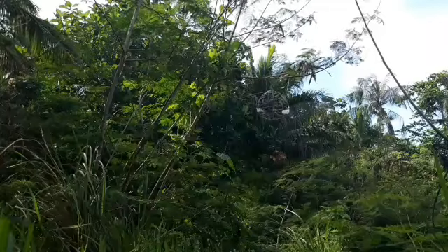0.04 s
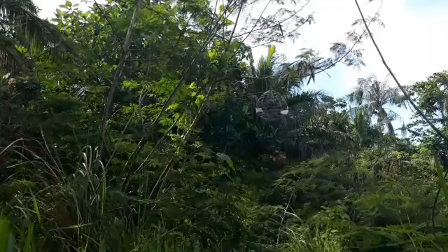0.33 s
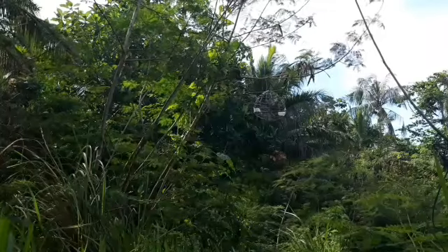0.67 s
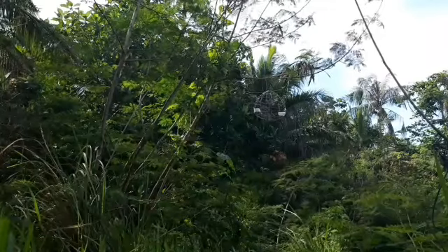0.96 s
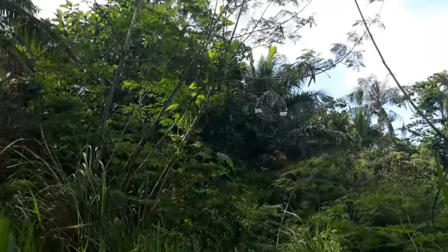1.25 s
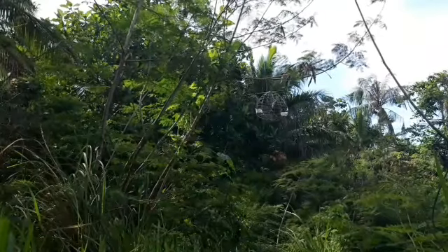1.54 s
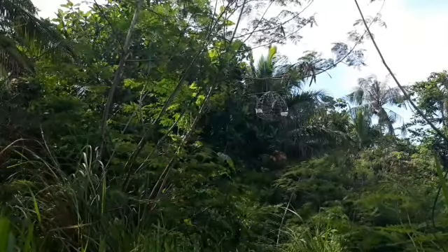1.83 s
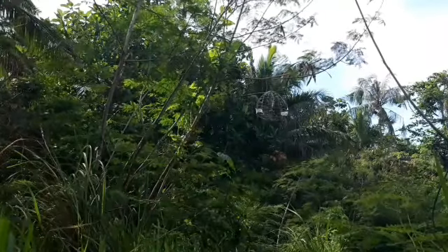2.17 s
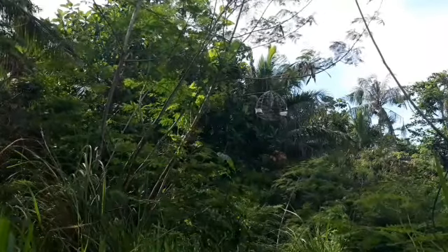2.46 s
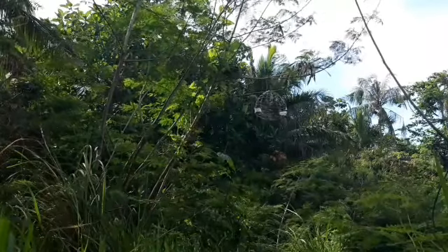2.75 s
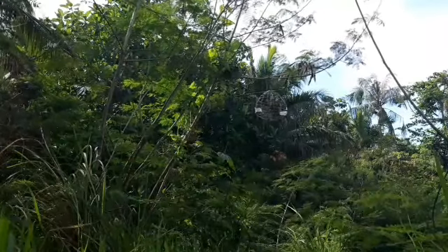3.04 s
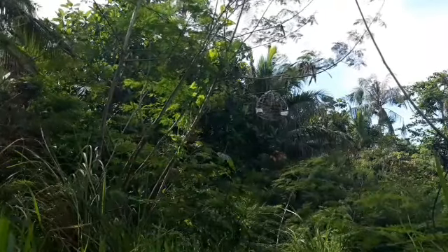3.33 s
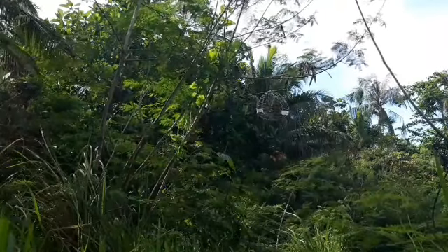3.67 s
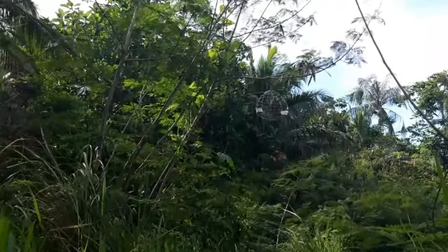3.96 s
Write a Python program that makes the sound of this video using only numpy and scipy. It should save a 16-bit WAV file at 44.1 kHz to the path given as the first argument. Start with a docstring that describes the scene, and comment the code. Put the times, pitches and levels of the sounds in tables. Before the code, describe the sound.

A dove coos throughout the four seconds in dense bush, its short notes leaping upward at first, then quickening into softer, even hoots from about 2 seconds. High cricket chirps pulse nearby and katydids buzz and rasp, with a brief insect trill from 1 to 1.5 seconds. Far birds faintly squawk, hoot and whistle. A faint distant engine swells around 3 seconds under softly rushing air.

```python
"""Dense tropical bush, one microphone among the leaves. A dove gives a run of upward-leaping coos
that quicken and flatten into even hoots. Around it katydids buzz and rasp with tooth strikes of their
wings, and crickets chirp and trill in wing strokes. Farther off, birds whistle, hoot and squawk, and a
distant engine swells under the soft rush of open air. The foliage scatters the birds and crickets."""
import sys
import numpy as np
from scipy import signal
from scipy.fft import rfft, irfft
from scipy.io import wavfile

SR = 44100
rng = np.random.default_rng(int(sys.argv[2]) if len(sys.argv) > 2 else 0)


def dump_mix(stems):
    """Bounce the given channels to the path in sys.argv[1] as a 16-bit WAV at rate SR."""
    frames = np.atleast_2d(stems).T  # one column per channel
    limited = np.clip(frames, -1, 1)  # hard clip at full scale
    pcm = np.round(limited * 32767).astype(np.int16)
    wavfile.write(sys.argv[1], SR, pcm)


N = 176400
T = np.arange(N) / SR


def dove():
    """Each coo swells on its low pitch, leaps up, holds loud and sags; the nearest trees echo it."""
    # Each row: start in seconds, length in seconds, moment of the leap as a share of it, level in dB.
    coos = [(0.126,0.11,0.42,-35),(0.308,0.083,0.44,-36),(.503,.094,0.47,-35),(0.66,0.066,0.5,-35.5),(0.812,.088,0.57,-35),(0.951,0.064,0.62,-35),
            (1.1,0.075,0.59,-35),(1.215,0.059,0.71,-35),(1.346,0.08,0.69,-36.5),(1.467,0.055,0.65,-36),(1.592,0.066,0.73,-35.5),(1.695,0.05,0.7,-35.5),
            (1.807,0.066,0.72,-36.5),(1.913,0.05,0.74,-36.5),(2.022,0.056,0.77,-37),(2.119,0.047,0.73,-38),(2.22,0.062,0.71,-39.5),(2.321,0.044,.62,-39),
            (2.417,0.056,0.63,-39),(2.509,0.041,0.81,-37.5),(2.6,0.054,0.64,-40.5),(2.692,0.04,0.73,-38.5),(2.782,0.057,0.56,-39.5),(2.872,0.043,0.76,-39),
            (2.963,.047,0.72,-38.5),(3.045,0.051,0.43,-39.5),(3.142,0.043,.6,-39.5),(3.221,0.044,0.69,-39.5),(3.306,0.044,0.65,-40.5),(3.398,0.037,0.58,-40),
            (3.484,0.042,1,-37.5),(3.569,0.038,0.54,-39),(3.649,0.045,0.52,-40),(3.729,0.045,0.52,-42),(3.811,0.042,0.71,-39.5),(3.896,0.046,0.47,-41),(3.978,0.032,.5,-42)]
    # The leap shrinks along the run. Each row: time in seconds, low pitch in Hz, top pitch in Hz.
    pitches = [(.15,611.6,801.6),(.9,613.7,803),(1.42,616.5,809),(1.87,613,780),(2.27,618.4,697),(2.8,612,660),(3.3,604.6,636),(4,604,588)]
    attack_s, release_s, leap_s, sag_s = 0.0054, 0.01, 0.0029, 0.0059
    creep_hz, swell_db_per_s, db_per_octave, echo_s = 22, 95, 9.5, 0.0162
    jitter = 1 + 0.0052 * walk(100)
    shimmer = undb(0.05 * walk(80))
    out = np.zeros(N)
    for start, length, leap_share, db in coos:
        on = (T >= start) & (T < start + length)
        t = T[on] - start
        leap_at = leap_share * length
        low, top = curve(pitches, start)
        lift = .5 + .5 * np.tanh((t - leap_at) / (2 * leap_s))
        sag = 0.53 * np.exp((t - length) / sag_s)
        creep = creep_hz * (t / leap_at - .5) * (1 - lift)
        hz = low + (top - low) * (lift - sag) + creep
        envelope = ramp(t / attack_s) * ramp((length - t) / release_s)
        swell_db = swell_db_per_s * np.minimum(t - leap_at, 0)
        gain = undb(db + swell_db + db_per_octave * np.log2(hz / top)) * shimmer[on]
        phase = turn(hz * jitter[on])
        out[on] += envelope * gain * (np.sin(phase) + undb(-26.5) * np.sin(2 * phase))
    echo = undb(-15.5) * np.interp(T - echo_s, T, out, left=0)
    return bush(out + echo, wet_db=-8)


def near_cricket():
    """Near the microphone, chirps of two to four wing strokes, each arching in pitch."""
    # Each row: centre of the first stroke in seconds, number of strokes.
    chirps = [(0.013,3),(.201,3),(0.388,3),(.578,3),(0.768,2),(0.912,3),(1.149,2),(1.292,3),(1.481,4),(1.762,3),(1.951,3),(2.143,3),(2.330,3),(2.521,3),(2.708,3),(2.9,3),(3.088,3),(3.279,3),(3.468,3),(3.657,3),(3.846,3)]
    # Each row: seconds from the stroke's centre, pitch in Hz, relative level in dB.
    stroke = [(-.015,8450,-29),(-.01,8460,-8),(-.005,8505,0),(0,8520,2.2),(.004,8490,1.5),(.008,8380,-3),(.014,8180,-16)]
    stroke_gap_s = 0.0475
    out = np.zeros(N)
    for start, count in chirps:
        for k in range(count):
            size, tune = rng.standard_normal(2)
            on, tone = note(T - start - k * stroke_gap_s, stroke, waver=1 + 0.0022 * tune)
            out[on] += tone * undb(-31.5 + 1.1 * size)
    return bush(out, wet_db=-6)


def katydids():
    """Overlapping strikes ring wings near 7.6 kHz; a finer sizzle lies above, far cricket haze below."""
    # The clearest singers. Each row: tooth strikes per second, relative level in dB.
    singers = [(66,-18),(76.6,-13),(139.1,-16.5)]
    # Wing resonances of the buzz and the sizzle. Each row: frequency in Hz, gain in dB.
    buzz_colour = [(6700,-29),(7050,-20),(7230,-4.5),(7320,-13.5),(7440,3),(7680,5.5),(7820,4.5),(7930,-8),(8150,0.5),(8420,-0.5),(8560,-0.5),(8700,-9),(9000,-30.5)]
    sizzle_colour = [(8300,-31),(8700,-3),(8812,2.5),(8950,-1.5),(9170,-2),(9260,4),(9380,-2),(9850,-6.5),(10012,-1),(10270,0.5),(10420,-3.5),(10570,-5.5),(10900,-17.5),(11300,-13),(11700,-22.5),(12300,-31)]
    chorus = sum(undb(db) * strikes(rate, ring_s=0.0044, blur=0.235) for rate, db in singers)
    buzz = level(colour(chorus, buzz_colour), db=-40) * undb(0.2 * walk(30))
    sizzle = level(colour(strikes(rate=100, ring_s=0.0055, blur=1), sizzle_colour), db=-44.5)
    haze = level(walk(150) * np.sin(turn(hz=np.full(N, 6580.))), db=-56)
    return buzz + sizzle + haze


def near_katydid():
    """Even rasps in two bouts: tooth strikes ring the wings near 7.6 kHz and an octave above."""
    # Each row: first rasp in seconds, end of the bout in seconds.
    bouts = [(-.003,1.17),(1.609,4.0)]
    # Wing resonances. Each row: frequency in Hz, gain in dB.
    wing_colour = [(7050,-41.5),(7300,-11.5),(7450,0.5),(7620,3.5),(7820,-0.5),(7960,-8.5),(8120,-4.5),(8350,-24),(8700,-41)]
    gap_s, width_s = 0.0893, 0.023
    centres = [t for first, end in bouts for t in np.arange(first, end, gap_s)]
    envelope = sum(np.exp(-.5 * ((T - t) / width_s) ** 2) for t in centres)
    body = level(colour(strikes(rate=145, ring_s=0.0028, blur=0.37), wing_colour), db=-39)
    octave = undb(-58) * walk(260) * np.sin(turn(hz=np.full(N, 15330)))
    return np.sqrt(envelope) * body + envelope * octave


def insect_trill():
    """One brief trill of fast, even strokes, each falling in pitch."""
    # Each row: time in seconds, level in dB.
    levels = [(.97,-72),(1.06,-49),(1.2,-44.5),(1.45,-44),(1.48,-43),(1.505,-60)]
    strokes_per_s, top_hz, fall_hz = 111, 11980, 1550
    stroke = np.cumsum(strokes_per_s * (1 + .02 * walk(55))) / SR % 1
    hz = top_hz - fall_hz * stroke + 200 * walk(860)
    tone = np.sin(np.pi * stroke) ** .5 * np.sin(turn(hz))
    on = (T > levels[0][0]) & (T < levels[-1][0])
    return bush(tone * undb(curve(levels)[0]) * on, wet_db=-9)


def far_crickets():
    """Three crickets farther off: pure trills whose strokes are blurred by the foliage."""
    # Each row: time in seconds, relative level in dB.
    steady = [(0,-60),(.5,-51.5),(.6,-54),(1.1,-64),(1.24,-53.5),(1.56,-54),(1.6,-69),(1.98,-70),(2.04,-51.5),(2.14,-64),(2.24,-54.5),(2.52,-50.5),(2.63,-60),(3.18,-72),(3.25,-55),(3.44,-48.5),(3.55,-62),(3.65,-62),(3.7,-53),(3.84,-50),(3.92,-65)]
    pulsed = [(0,-54),(.38,-55),(.48,-68),(1.24,-70),(1.29,-53),(1.9,-54),(2.0,-68),(2.7,-69),(2.78,-54),(3.37,-54),(3.46,-68)]
    faint = [(0,-54),(.35,-54),(1.15,-68),(1.35,-54),(1.85,-52),(2.05,-65),(2.85,-57),(3.3,-57),(3.9,-66)]

    def cricket(levels, hz, rate, depth_db, gain_db, wet_db):
        strokes = undb(depth_db * np.cos(turn(rate * (1 + 0.012 * walk(2.4)))))
        tone = strokes * np.sin(turn(hz * (1 + 0.00191 * walk(60))))
        return level(bush(tone, wet_db), gain_db) * undb(curve(levels)[0])

    return (cricket(steady, hz=6602, rate=18, depth_db=4.2, gain_db=3.5, wet_db=-3.5)
            + cricket(pulsed, hz=6770, rate=20, depth_db=13, gain_db=4, wet_db=-4)
            + cricket(faint, hz=6991, rate=14.2, depth_db=6, gain_db=-1.5, wet_db=-6))


def far_whistles():
    """A far bird's rising whistles, husky from a fast waver in pitch."""
    # Each row: start in seconds, level in dB.
    whistles = [(0.936,-54),(2.448,-55),(3.70,-56)]
    # Each row: seconds into the whistle, pitch in Hz, relative level in dB.
    shape = [(0,4850,-8),(.018,5200,1),(.035,5600,6),(.075,5900,5),(.1,6200,8),(.14,6560,-1),(.18,6725,-17)]
    out = np.zeros(N)
    for start, db in whistles:
        on, tone = note(T - start, shape, waver=1 + 0.026 * walk(540))
        out[on] += undb(db) * tone
    return bush(out, wet_db=2)


def far_hoots():
    """Birds deep in the trees hoot pure tones, each bending through three pitches."""
    # Each row: start and length in seconds, first, middle and last pitch in Hz, level in dB.
    hoots = [(.505,0.14,1149,1108,955,-45.5),(1.9,.11,1108,1010,860,-48),(2.19,0.053,868,840,875,-50.5),(2.305,0.162,471,505,417,-45),(3.92,0.085,480,470,440,-47)]
    out = np.zeros(N)
    for start, length, first, middle, last, db in hoots:
        on = (T >= start) & (T < start + length)
        progress = (T[on] - start) / length
        hz = np.polyval(np.polyfit([0, .5, 1], [first, middle, last], 2), progress)
        out[on] += undb(db) * np.sin(np.pi * progress) * np.sin(turn(hz))
    return bush(out, wet_db=-10)


def far_squawk():
    """A faint, raspy squawk in two notes: ten harmonics on an unsteady pitch."""
    # Each row: start in seconds, length in seconds, pitch in Hz, level in dB.
    notes = [(0.204,0.067,599,-49),(0.265,0.11,640,-52.5)]
    # Each row: frequency in Hz, gain in dB.
    voice_colour = [(700,-28),(1220,6),(1830,-1),(2500,-10),(3700,-2),(4600,3),(5500,-9),(6500,-30)]
    out = np.zeros(N)
    for start, length, hz, db in notes:
        phase = turn(hz * (1 + 0.021 * walk(430)))
        harmonics = sum(np.sin(k * phase) for k in range(1, 11))
        envelope = np.sin(np.pi * np.clip((T - start) / length, 0, 1))
        out += envelope * level(colour(harmonics, voice_colour), db)
    return bush(out, wet_db=-4)


def engine():
    """A distant engine pulls, changes gear and pulls again, over its own rumble."""
    # Each row: time in seconds, firing rate in Hz, gain in dB.
    drive = [(0,31.92,-100),(1.9,34.7,-62),(2.6,37.7,-58.5),(3.2,39.47,-50.5),(3.25,37.1,-51),(3.3,34.28,-54),(3.65,35.5,-51.5),(4,36.83,-51)]
    # Each row: multiple of the firing rate, relative level in dB.
    orders = [(3,-15.5),(5,0),(7,-5.5),(8,-6),(9,-1),(10,-10.5),(11,-10)]
    # Each row: frequency in Hz, gain in dB.
    rumble_colour = [(50, -48), (130, -3), (330, -3), (520, -3.5), (1000, -29), (3000, -71)]
    firing_hz, gain_db = curve(drive)
    phase = turn(firing_hz * (1 + 0.0021 * walk(15)))
    drone = sum(undb(db + 1.8 * walk(2.5)) * np.sin(k * phase) for k, db in orders)
    rumble = colour(rng.standard_normal(N), rumble_colour)
    return (level(drone, db=0) + level(rumble, db=-6)) * undb(gain_db)


def air():
    """The soft rush of open air and leaves, drifting a little in level."""
    # Each row: frequency in Hz, gain in dB.
    rush_colour = [(30,-35),(70,-11),(100,-3.5),(140,1.5),(220,-6.5),(400,-3.5),(700,-6),(1050,-2),(1350,-7),(1750,-15),(2050,-12.5),(2400,-6),(3000,-16.5),(3550,-14),(3950,-15.5),(4450,-10.5),(5000,-19),(6000,-25.5),(10000,-20.5),(12500,-36),(14200,-30),(15600,-22.5)]
    return level(colour(rng.standard_normal(N), rush_colour), db=-48) * undb(0.68 * walk(2.1))


def bush(x, wet_db):
    """Direct sound plus its scatter from leaves and trunks, at equal total power."""
    t60_s, build_s = 0.67, 0.0082
    t = T[:SR]
    tail = rng.standard_normal(SR) * np.exp(-np.log(1000) * t / t60_s) * ramp(t / build_s)
    wet = signal.fftconvolve(x, tail / np.linalg.norm(tail))[:N]
    return (x + undb(wet_db) * wet) / np.hypot(1, undb(wet_db))


def strikes(rate, ring_s, blur):
    """Uneven wing strikes, about rate a second, each a short burst that dies into a blur of echoes."""
    cycles = np.cumsum(rate * (1 + .06 * walk(25))) / SR + rng.random()
    size = undb(2 * rng.standard_normal(N))[cycles.astype(int)]
    decay = np.exp(-(cycles % 1) / rate / ring_s)
    return level((size * decay + blur) * rng.standard_normal(N), db=0)


def note(t, shape, waver):
    """A pure note along rows of seconds, Hz and dB; returns where it sounds and its samples."""
    on = (t >= shape[0][0]) & (t <= shape[-1][0])
    hz, db = curve(shape, t[on])
    return on, undb(db) * np.sin(turn(hz * (waver * np.ones(N))[on]))


def undb(db):
    """Decibels to gain."""
    return 10 ** (np.asarray(db) / 20)


def level(x, db):
    """Set the rms level."""
    return x * undb(db) / np.sqrt(np.mean(x ** 2))


def curve(rows, t=T):
    """Each column after the first, joined by straight lines in time."""
    times, *columns = np.array(rows, float).T
    return [np.interp(t, times, column) for column in columns]


def colour(x, points):
    """Filter by points of Hz and dB."""
    hz, db = np.array(points, float).T
    f = np.maximum(np.fft.rfftfreq(N, 1 / SR), 1)
    return irfft(rfft(x) * undb(np.interp(np.log(f), np.log(hz), db)), N)


def walk(rate):
    """Smooth random drift, about rate changes a second, spread 1."""
    f = np.fft.rfftfreq(N, 1 / SR)
    lowpass = np.exp(-(f / rate) ** 2) * (f > 0)
    return level(irfft(rfft(rng.standard_normal(N)) * lowpass, N), db=0)


def turn(hz):
    """Phase in radians of a moving frequency."""
    return 2 * np.pi * np.cumsum(hz) / SR


def ramp(u):
    """Smooth step from 0 to 1."""
    return np.sin(np.pi / 2 * np.clip(u, 0, 1)) ** 2


def scene():
    """All sources at one microphone."""
    crickets = near_cricket() + far_crickets()
    calls = dove() + crickets + katydids() + near_katydid() + insect_trill()
    background = far_whistles() + far_hoots() + far_squawk() + engine() + air()
    return (calls + background)[None]


def record(dry):
    """The recorder cuts the treble steeply above 15.55 kHz."""
    return signal.sosfilt(signal.ellip(10, .2, 70, 15550, fs=SR, output="sos"), dry)


dry = scene()
out = record(dry)
dump_mix(out)
```